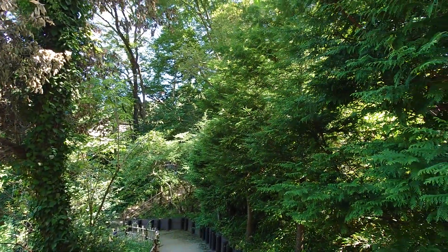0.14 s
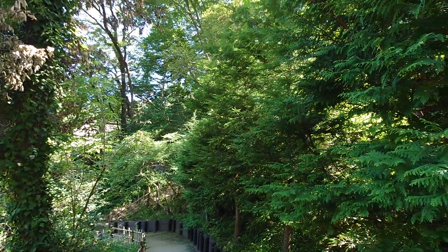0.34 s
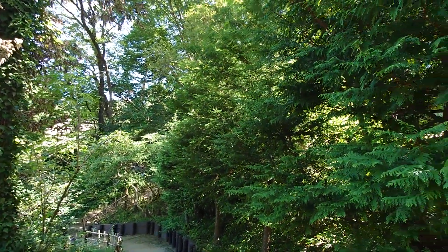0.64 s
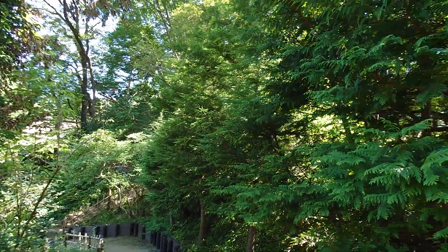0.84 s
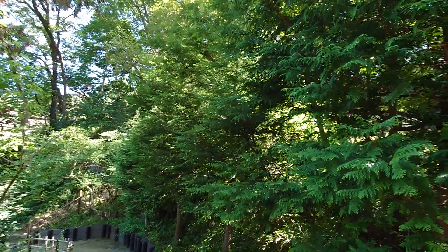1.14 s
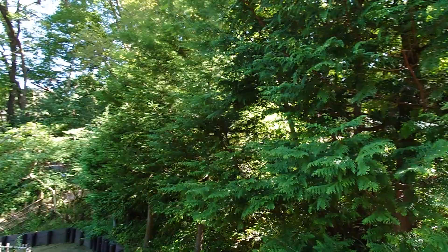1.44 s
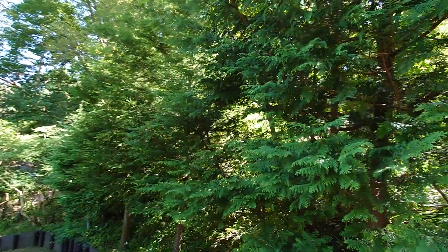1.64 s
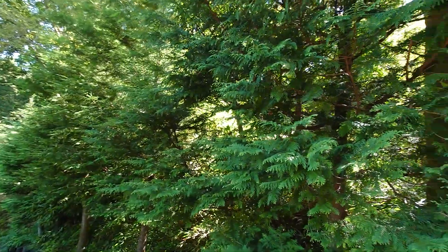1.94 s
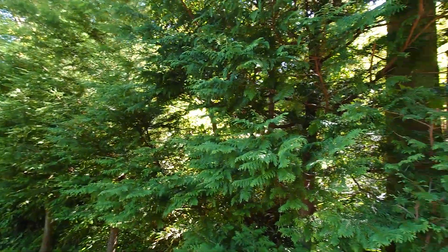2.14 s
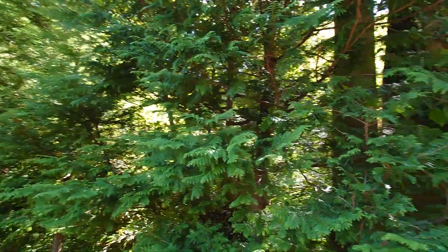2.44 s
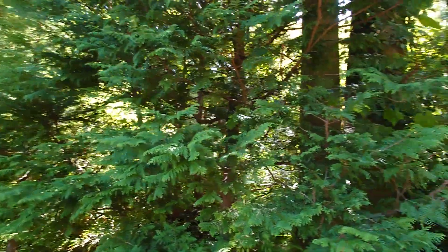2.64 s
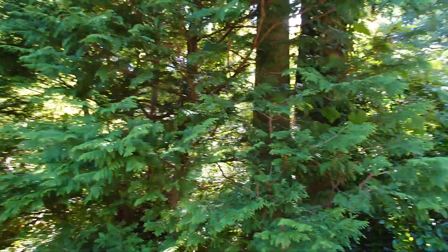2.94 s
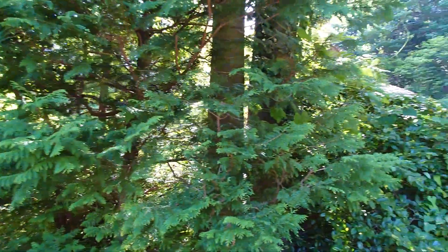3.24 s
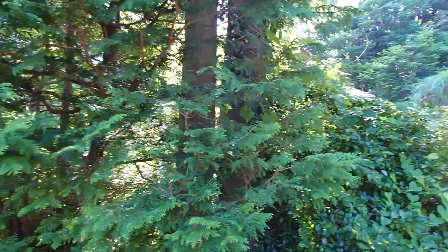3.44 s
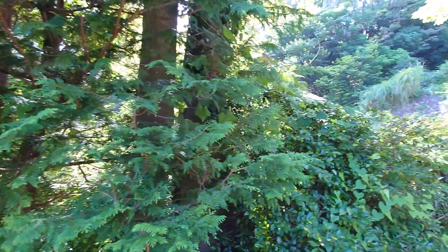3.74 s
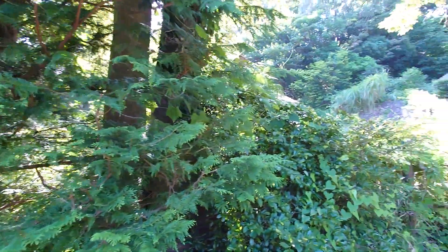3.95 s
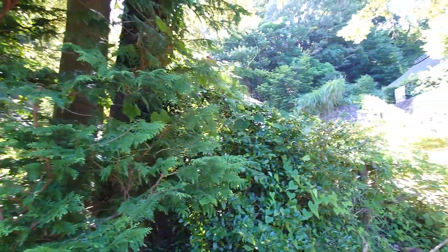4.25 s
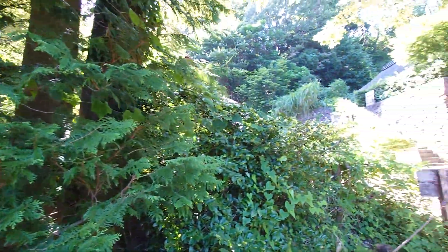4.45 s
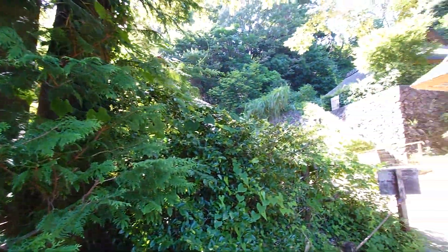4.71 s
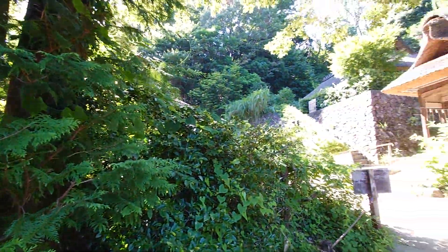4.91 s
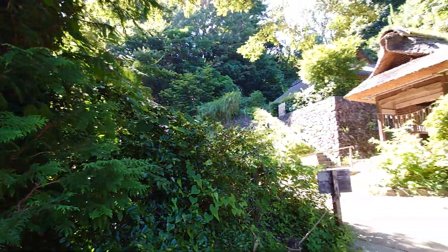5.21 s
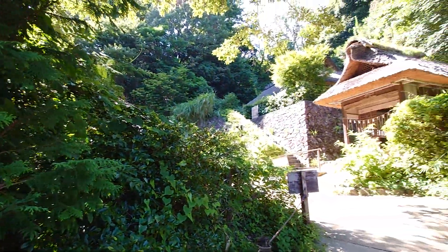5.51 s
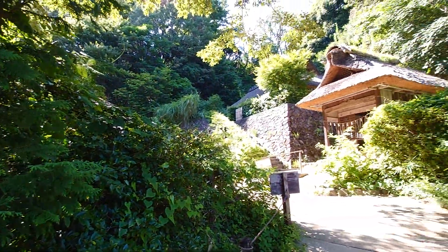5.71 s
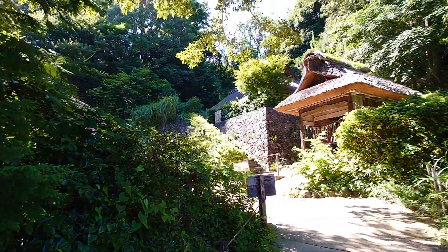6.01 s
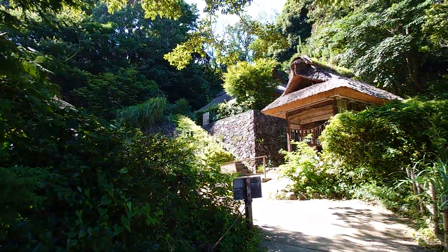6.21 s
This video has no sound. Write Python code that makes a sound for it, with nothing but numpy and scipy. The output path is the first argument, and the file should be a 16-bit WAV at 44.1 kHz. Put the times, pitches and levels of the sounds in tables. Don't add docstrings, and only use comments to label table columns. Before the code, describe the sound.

A continuous high cicada choir fills both sides, a little brighter and louder on the right. Thinner, lower and higher layers shimmer with rapid pulsing, and distant singers add a faint narrow hum. Fingers tap and knock the device housing now and then, mostly in the first half. A nearer insect pulses briefly in the last seconds. Open wooded place, quiet air, faint low traffic, microphone held in the hand.

```python
import sys
import numpy as np
from scipy import signal
from scipy.fft import rfft, irfft
from scipy.io import wavfile
from scipy.ndimage import uniform_filter1d

SR = 44100
rng = np.random.default_rng(int(sys.argv[2]) if len(sys.argv) > 2 else 0)


def master(y):
    cut = np.clip(np.atleast_2d(y).T, -1, 1)
    pcm = np.round(cut * 32767)
    wavfile.write(sys.argv[1], SR, pcm.astype(np.int16))


def ratio(d):
    e = np.asarray(d, float) / 20
    return 10 ** e


N = 280917
TIME_S = np.arange(N) / SR
HZ = np.maximum(np.arange(N // 2 + 1) * SR / N, 1)

# pitch_hz, left_db_per_hz, right_db_per_hz
SHRILL_BODY = [(6700, -106.9, -89.9), (7100, -82.5, -68.3), (7450, -71.4, -62.6), (7750, -62.3, -58.8),
               (8200, -61.8, -55.7), (8600, -63.7, -57.2), (9000, -67.2, -60.1), (9600, -73.2, -64.7),
               (10200, -80.1, -69.8), (10800, -86.3, -73.6), (11100, -92.5, -75.2), (11600, -93.5, -76.1),
               (12000, -89.4, -76.5), (12800, -108.4, -96.9)]
MIDDLE_BODY = [(3500, -118, -108), (4000, -90, -85), (4300, -83, -82), (4500, -80.5, -79),
               (4800, -80, -75.5), (4950, -78, -70), (5100, -79, -71), (5350, -77, -69.5), (5750, -78, -69),
               (6000, -81, -67.5), (6250, -80, -65.5), (6450, -86.5, -68.5), (6850, -88.5, -70.5),
               (7200, -105, -88)]
HIGH_BODY = [(11900, -102, -88), (12300, -89.5, -78), (12800, -88, -77), (13300, -87.0, -76.5),
             (14000, -85.4, -73.9), (14800, -84.0, -69.6), (15500, -83.2, -68.0), (16500, -83, -68)]
# pitch_hz, left_db_per_hz, right_db_per_hz
AIR_COLOUR = [(25, -100, -98), (70, -100, -97), (130, -97, -94), (200, -95.5, -88), (360, -94, -89.5),
              (560, -96.5, -94), (1400, -100, -93.5), (2000, -100, -92), (2400, -98, -91),
              (3050, -102, -91), (3200, -96.5, -87.5), (3450, -103, -90), (3650, -95, -87),
              (3870, -98, -89)]
# pitch_hz, likeness_0_to_1
AIR_LIKENESS = [(60, 0.21), (110, 0.048), (200, .65), (380, 0.4), (700, 0.74), (1300, 0.033), (2000, 0.035)]

# time_s, muscle_rate_hz, second_click_strength_0_to_1
DRUM = [(0, 197.0, .8), (1, 197.0, .7), (1.6, 197.0, .2), (2.5, 197.1, .4), (3.5, 197.8, .2),
        (4.5, 198.0, .3), (5.3, 197.0, .2), (6.37, 197.0, .3)]
# settled_lead_cycles, early_lead_cycles, mean_share_0_to_1, share_swing, in_step_s
MIDDLE_THROB = (-.62, 0.58, .38, .17, 1.1)
HIGH_THROB = (-.2, 0.47, 0.21, 0.027, 0.59)
THROB_HZ = 15.6
SETTLE_S, BEAT_S = 1.1, 1.56

# start_s, length_s, level_db
CLOSE_PHRASES = [
    (4.1, .7, -65),
    (5.15, .55, -52),
    (5.85, .6, -56),
]
CLOSE_ATTACK_S, CLOSE_RELEASE_S = 0.27, 0.15
# pitch_hz, width_hz, left_db, right_db
LOW_BELLIES = [(2826, 48, -71.5, -64.5), (2763, 55, -74, -66.5), (2555, 65, -77.5, -69),
               (2162, 200, -74, -69.5), (2925, 90, -81, -72)]

# time_s, heading_deg
HEADING = [(0, 0), (5.3, 90), (6.37, 100)]
VIEW_DEG = 10.04
# left_db, right_db
SHRILL_TREES = [(-0.5, 1.1, 2.6), (22, 1.7, 2.2), (58, 0.58, 0.23), (71.5, 0.75, 1.16), (87.5, -0.19, 1.56)]
SHRILL_REST = (-0.98, -1.48)
MIDDLE_TREES = [(26.6, 1.9, .1), (51, 1.3, 0.38), (70, 2.1, 1.5), (95.7, 1, 2.2)]
MIDDLE_REST = (-1.6, -0.74)
HIGH_TREES = [(5, .1, 1.6), (28, 1.1, .3), (55, 2.5, 0.91), (68, .3, 2.3), (88, 1.2, 2.1), (103, .6, 1.3)]
HIGH_REST = (-1.1, -1.6)
LOW_TREES = [(27, 3.7, .6), (52, 5.7, 1.1), (68, 1.5, 7), (94.6, 4.5, 5)]
LOW_REST = (-0.55, -1.1)

# time_s, peak_db, ring_hz, left_minus_right_db
KNOCKS = [
    (1.446, -41.5, 1940, -7.5),
    (1.447, -53, 526, 0),
    (1.543, -54, 303, -9),
    (2.429, -50, 1190, -10),
    (3.334, -50, 950, -2),
    (3.337, -53, 410, 2),
    (3.341, -48, 800, -3),
    (4.917, -54, 310, -6),
]
THUMPS = [
    (2.413, -61, 150, -9),
    (2.854, -57, 94.2, 6),
    (3.899, -58, 127, -7),
    (4.121, -55, 76, -10),
    (5.03, -53, 178, -14),
]
TAPS = [
    (0.084, -51, 286, -10.5),
    (0.0915, -40, 360, -8),
    (1.4465, -51, 2600, -4),
    (2.4345, -50, 131, -14),
    (2.49, -47, 400, -6),
]

# left_db, right_db
TRAFFIC = [(10, .8, .8), (47, 3.1, 2), (70.5, 3.2, 1.9)]
TRAFFIC_REST = (-0.4, -1.5)
RUMBLE_EDGES_HZ = [30, 120, 200, 300, 480]
PATCH_DB = 2.5

# pitch_hz, left_db_per_hz, right_db_per_hz
STEP = [(300, -103, -97), (1500, -95.5, -90), (2400, -92, -86), (3300, -93, -82), (3900, -84, -76.5),
        (4500, -76, -72.5), (5400, -82, -77), (6700, -78.5, -76), (8000, -78, -76), (10300, -80, -82),
        (11300, -81, -82), (12200, -80.5, -81), (13500, -83, -81), (15800, -83, -78)]
FRAME, FRAME_START = 1024, 473
CUTOFF_HZ = 15750


def shrill_choir():
    return colour(crowd(26000, uneven_db=0.55), SHRILL_BODY) * ratio(facing(SHRILL_TREES, SHRILL_REST))


def crowd(clicks_per_s, uneven_db):
    born = rng.random((2, N)) < clicks_per_s / SR
    clicks = born * rng.standard_normal((2, N))
    return rms_one(clicks * ratio(uneven_db * drift(9.2)))


def throbbing_choir(body, swell_db, throb, near_from_hz, nearness, wander, sharp, t60, uneven_db):
    settled, early, mean, swing, in_step_s = throb
    lead = settled + early * np.exp(-TIME_S / SETTLE_S)
    in_step = np.cos(2 * np.pi * (TIME_S - in_step_s) / BEAT_S)
    share = np.clip(nearness * (mean + swing * in_step), 0, 0.95)
    near = near_singers(lead, wander, sharp, t60, count=3)
    far = crowd(24000, uneven_db)
    mix = np.sqrt(share) * near + np.sqrt(1 - share) * far
    above = signal.butter(4, near_from_hz, "high", fs=SR, output="sos")
    below = signal.butter(4, near_from_hz, "low", fs=SR, output="sos")
    mix = signal.sosfilt(above, mix) + signal.sosfilt(below, far[:, ::-1])
    return colour(mix, body) * ratio(swell_db)


def near_singers(lead, wander, sharp, t60, count):
    rate_hz, second = in_time(DRUM)
    out = 0
    for detune, start in rng.standard_normal((count, 2)):
        own_rate_hz = rate_hz * (1 + wander * (detune + drift(6, channels=1)[0]))
        halves = np.floor(2 * (start + np.cumsum(own_rate_hz) / SR))
        clicks = np.diff(halves, prepend=halves[0]) * np.where(halves % 2, second, 1)
        uneven = 1 + 0.043 * rng.standard_normal(N)
        out = out + through_leaves(clicks * uneven, t60)
    throb = 0.5 + 0.5 * throb_wave(lead)
    without_rumble = signal.lfilter([1, -1], [1, -0.95], out)
    return rms_one(without_rumble * throb ** sharp)


def throb_wave(lead):
    return np.cos(2 * np.pi * (THROB_HZ * TIME_S + lead))


def through_leaves(clicks, t60):
    t = np.arange(int(0.08 * SR)) / SR
    echoes = rng.standard_normal((2, len(t))) * ratio(-60 * t / t60)
    return signal.fftconvolve(clicks[None], echoes, axes=1)[:, :N]


def close_singer():
    r = np.exp(-np.pi * 130 / SR)
    belly = [[0.82, 0.024, -1, 1, -2 * r * np.cos(2 * np.pi * 5860 / SR), r * r]] * 2
    throb = (0.5 + 0.5 * throb_wave(0.38)) ** 1.5
    phrases = 0
    for start_s, length_s, level_db in CLOSE_PHRASES:
        rise = (TIME_S - start_s) / CLOSE_ATTACK_S
        fall = (start_s + length_s - TIME_S) / CLOSE_RELEASE_S + 1
        phrases = phrases + ratio(level_db) * np.clip(np.minimum(rise, fall), 0, 1)
    song = rms_one(signal.sosfilt(belly, crowd(9800, uneven_db=1.5)) * throb)
    return song * phrases * ratio(np.array([[0], [-4]]))


def low_singers():
    out = 0
    for pitch_hz, width_hz, left_db, right_db in LOW_BELLIES:
        r = np.exp(-np.pi * width_hz / SR)
        belly = [[0.97, 0.0052, -1.07, 1, -2 * r * np.cos(2 * np.pi * pitch_hz / SR), r * r]] * 2
        hum = rms_one(signal.sosfilt(belly, crowd(9000, uneven_db=0.5)))
        out = out + hum * ratio(np.array([[left_db], [right_db]]))
    throb = 1 + 0.062 * throb_wave(0.38)
    return out * throb * ratio(facing(LOW_TREES, LOW_REST))


def knocks(events, cycles, crack, trim_db):
    out = np.zeros((2, N + SR))
    t = np.arange(SR // 8) / SR
    dull = signal.butter(2, [150, 4000], "band", fs=SR, output="sos")
    for time_s, peak_db, ring_hz, pan_db in events:
        fade = ratio(-60 * t * ring_hz / cycles)
        ring = np.sin(2 * np.pi * ring_hz * t) * fade * np.tanh(t / 0.00029)
        hiss = signal.sosfilt(dull, rng.standard_normal(len(t)))
        blow = ring + crack * hiss * ratio(-60 * t / 0.028)
        start = int(time_s * SR)
        sides_db = pan_db / 2 * np.array([[1], [-1]])
        out[:, start:start + len(t)] += blow * ratio(peak_db + trim_db + sides_db)
    return out[:, :N]


def handling():
    ringing = knocks(KNOCKS, cycles=17.0, crack=1.0, trim_db=2.3)
    deep = knocks(THUMPS, cycles=10.0, crack=0.46, trim_db=-4.0)
    return ringing + deep + knocks(TAPS, cycles=3.1, crack=0.14, trim_db=3.8)


def air():
    both, left, right = rfft(rng.standard_normal((3, N)))
    alike = np.clip(at_hz(AIR_LIKENESS), 0, 1)
    sides = np.sqrt(alike) * both + np.sqrt(1 - alike) * np.array([left, right])
    noise = colour(irfft(sides, N), AIR_COLOUR)
    out = noise
    swell_db = facing(TRAFFIC, TRAFFIC_REST)
    for low, high, patch in zip(RUMBLE_EDGES_HZ, RUMBLE_EDGES_HZ[1:], drift(4.3, channels=4)):
        band = signal.sosfilt(signal.butter(1, [low, high], "band", fs=SR, output="sos"), noise)
        out = out + 0.75 * band * (ratio(swell_db + PATCH_DB * patch) - 1)
    return out


def facing(trees, rest):
    heading = in_time(HEADING)[0, ::100]
    gain_db = np.array(rest)[:, None]
    for bearing, *db in trees:
        nearness = np.exp(-0.5 * ((heading - bearing) / VIEW_DEG) ** 2)
        gain_db = gain_db + nearness * np.array(db)[:, None]
    return in_time(np.c_[np.arange(len(heading)) * 100 / SR, gain_db.T])


def colour(white, body, skirt_db_oct=60):
    octaves_below = np.maximum(np.log2(body[0][0] / HZ), 0)
    octaves_above = np.maximum(np.log2(HZ / body[-1][0]), 0)
    gain_db = at_hz(body) - skirt_db_oct * (octaves_below + octaves_above)
    return irfft(rfft(white) * ratio(gain_db) * np.sqrt(SR / 2), N)


def drift(rate, channels=2):
    r = np.exp(-80 * np.pi * rate / SR)
    white = rng.standard_normal((channels, N // 40 + 2002))
    slow = rms_one(signal.lfilter([1], [1, -2 * r, r * r], white)[:, 2000:])
    return np.array([np.interp(np.arange(N) / 40, np.arange(len(row)), row) for row in slow])


def rms_one(x):
    return x / np.sqrt(np.mean(x ** 2, axis=-1, keepdims=True) + 1e-20)


def in_time(rows):
    s, *columns = np.transpose(rows)
    return np.array([np.interp(TIME_S, s, c) for c in columns])


def at_hz(rows):
    hz, *columns = np.transpose(rows)
    return np.array([np.interp(np.log(HZ), np.log(hz), c) for c in columns])


def scene():
    middle = throbbing_choir(MIDDLE_BODY, facing(MIDDLE_TREES, MIDDLE_REST), MIDDLE_THROB,
                             near_from_hz=4600, nearness=0.95, wander=0.009, sharp=0.23,
                             t60=0.085, uneven_db=0.1)
    high = throbbing_choir(HIGH_BODY, facing(HIGH_TREES, HIGH_REST), HIGH_THROB,
                           near_from_hz=13400, nearness=1.0, wander=0.0005, sharp=0.9,
                           t60=0.04, uneven_db=0.3)
    return shrill_choir() + middle + high + close_singer() + low_singers() + handling() + air()


def coarse_steps(x, frame_db, band_db):
    window = signal.windows.kaiser_bessel_derived(2 * FRAME, 4 * np.pi)
    frames = dict(fs=SR, window=window, nperseg=2 * FRAME, noverlap=FRAME, scaling="psd")
    lead_in = FRAME - FRAME_START
    hz, s, z = signal.stft(np.pad(x, ((0, 0), (lead_in, 0))), **frames)
    bins = np.minimum(hz * N / SR, N // 2).astype(int)
    step_db = at_hz(STEP)[:, bins, None] - 3
    band = (36 * np.log(1 + hz / 600)).astype(int)
    moments = np.minimum(s * SR, N - 1).astype(int)
    frame_waver = frame_db * drift(6)[:, None, moments]
    chance = rng.standard_normal((2, band.max() + 1, len(s)))
    band_waver = band_db * uniform_filter1d(chance, size=4)[:, band]
    step = ratio(step_db + frame_waver + band_waver)
    rounded = np.round(abs(z) / step) * step * np.exp(1j * np.angle(z))
    return signal.istft(rounded, **frames)[1][:, lead_in:][:, :N]


def band_limit(x):
    return signal.sosfilt(signal.butter(12, 15790, fs=SR, output="sos"), x)


def record(dry):
    cut = irfft(rfft(dry) * (HZ < CUTOFF_HZ), N)
    mix = coarse_steps(cut, frame_db=1.0, band_db=6.0)
    return band_limit(mix)


dry = scene()
out = record(dry)
master(out)
```